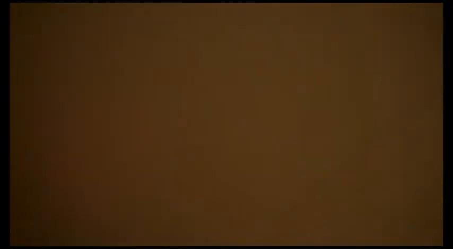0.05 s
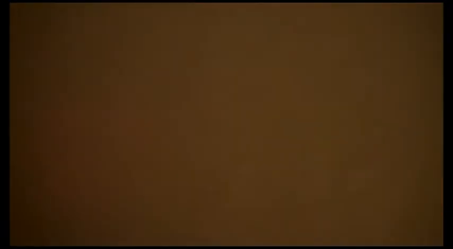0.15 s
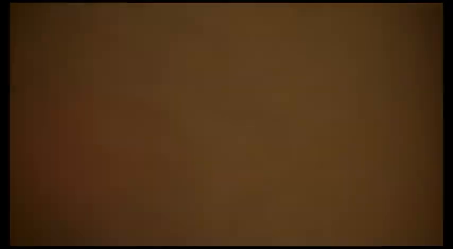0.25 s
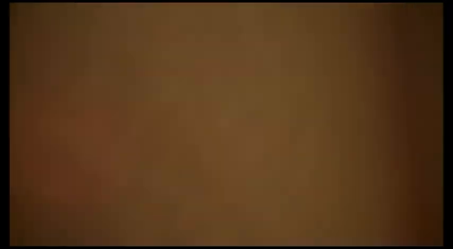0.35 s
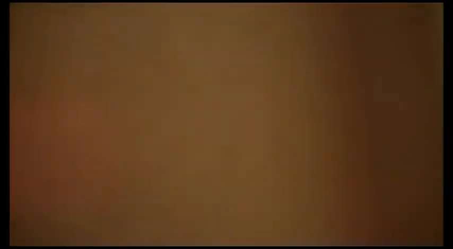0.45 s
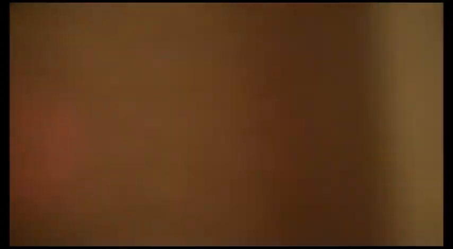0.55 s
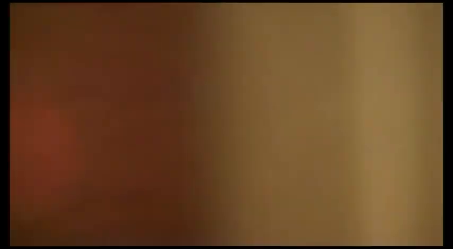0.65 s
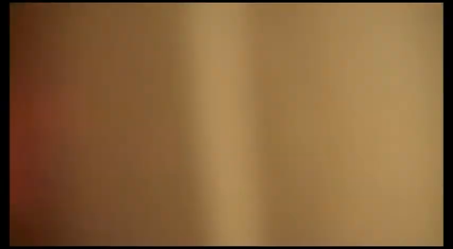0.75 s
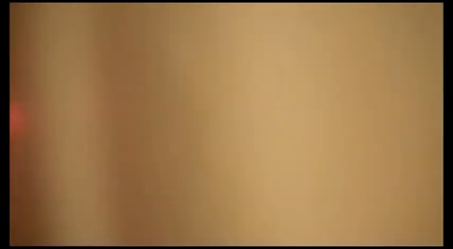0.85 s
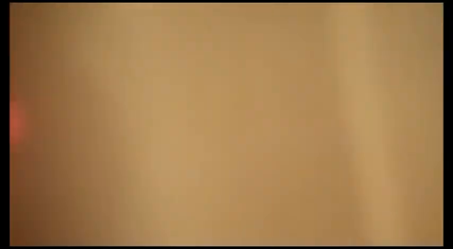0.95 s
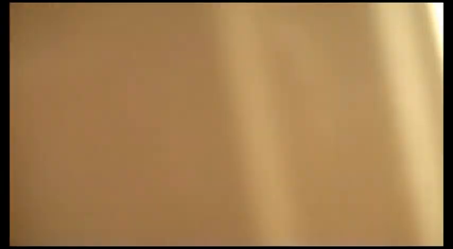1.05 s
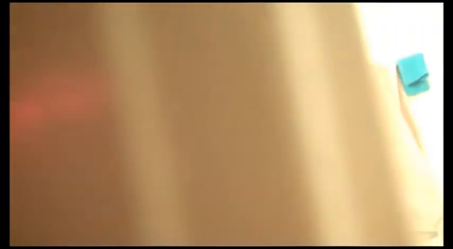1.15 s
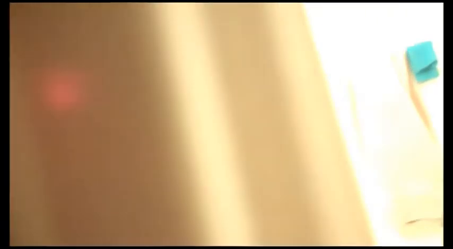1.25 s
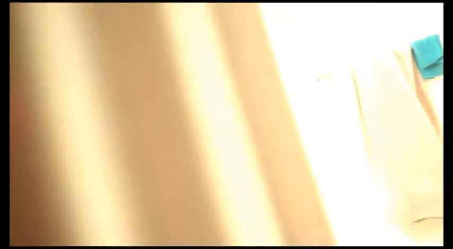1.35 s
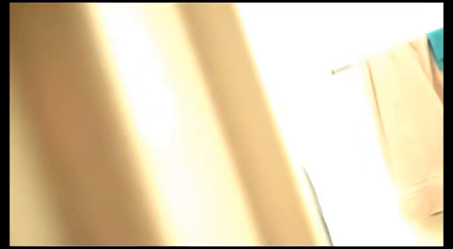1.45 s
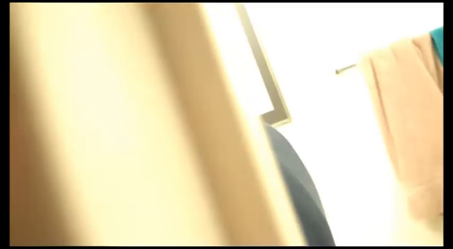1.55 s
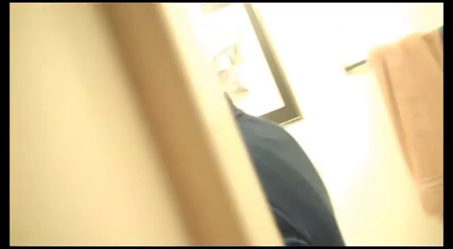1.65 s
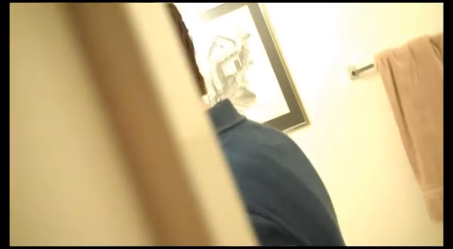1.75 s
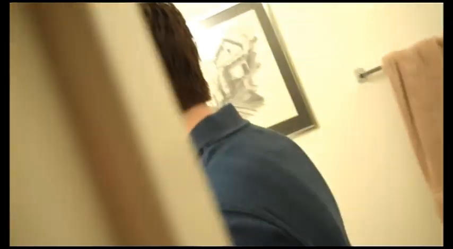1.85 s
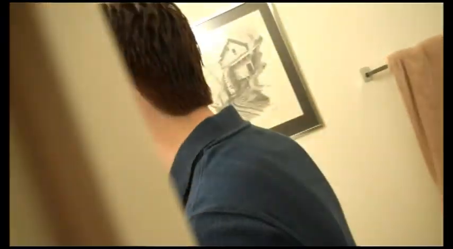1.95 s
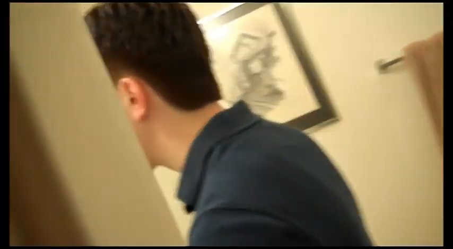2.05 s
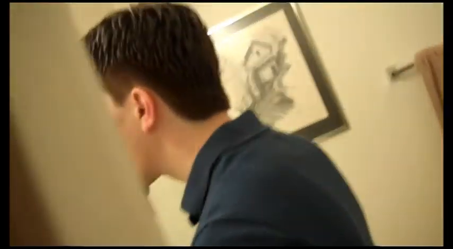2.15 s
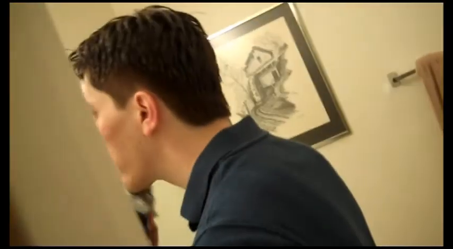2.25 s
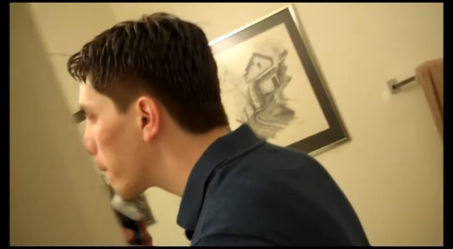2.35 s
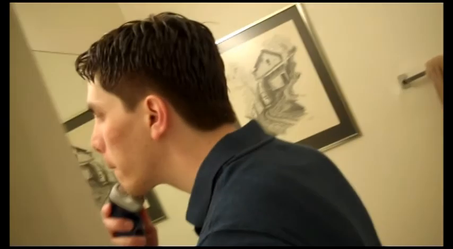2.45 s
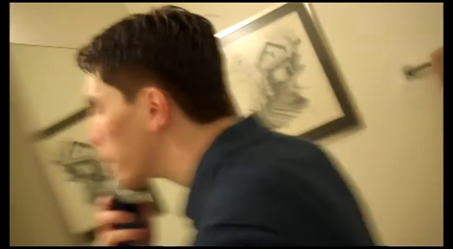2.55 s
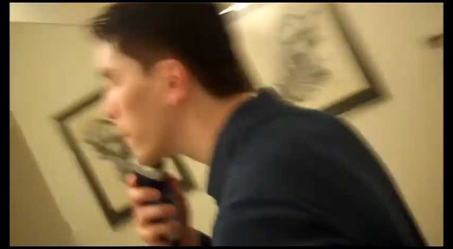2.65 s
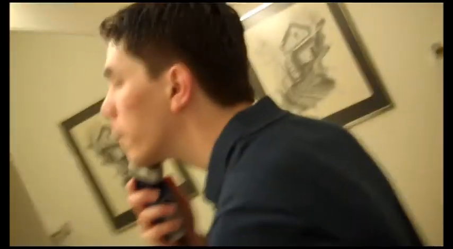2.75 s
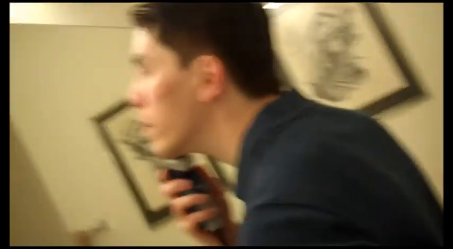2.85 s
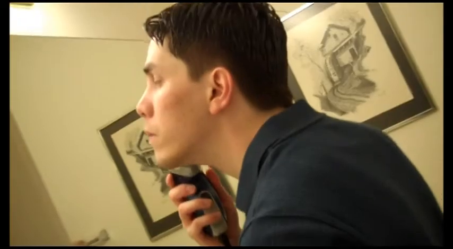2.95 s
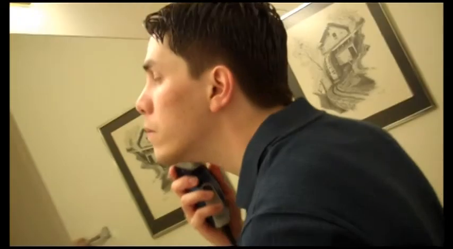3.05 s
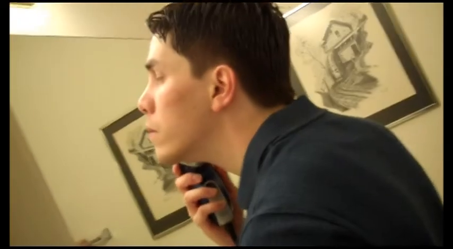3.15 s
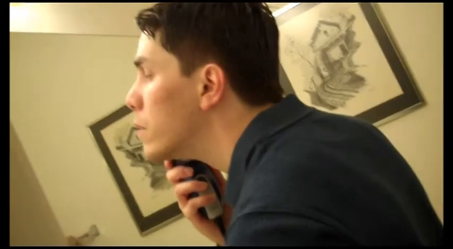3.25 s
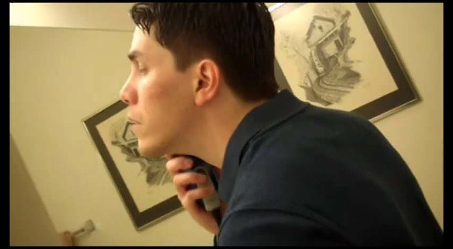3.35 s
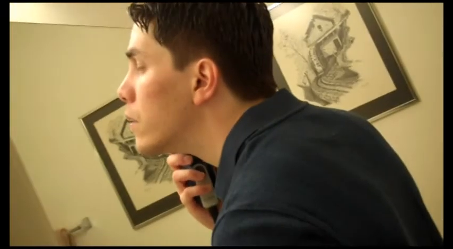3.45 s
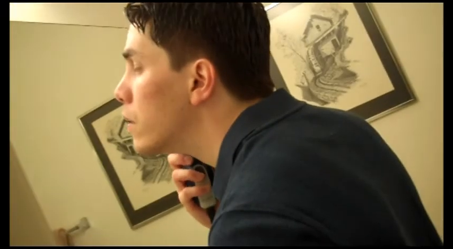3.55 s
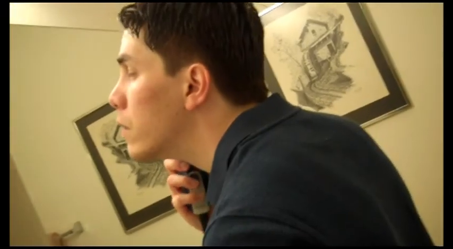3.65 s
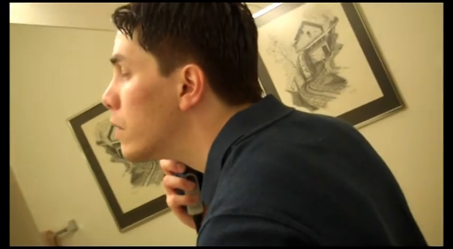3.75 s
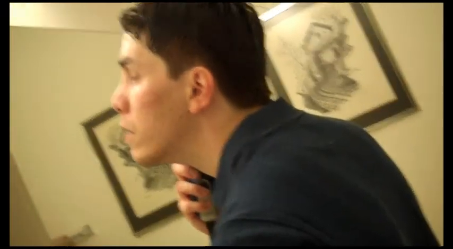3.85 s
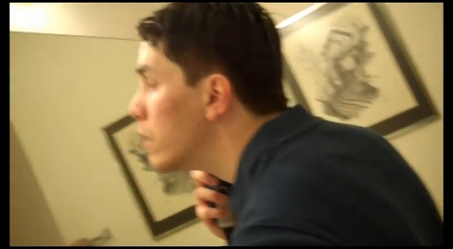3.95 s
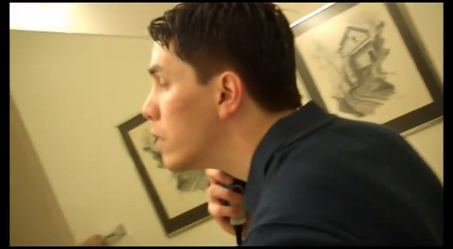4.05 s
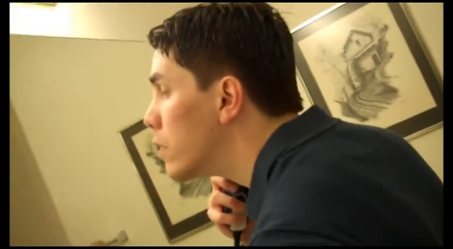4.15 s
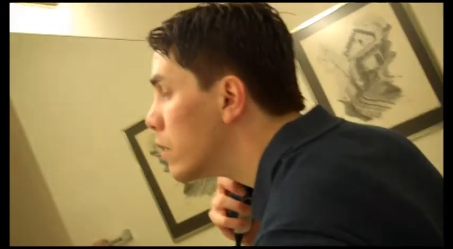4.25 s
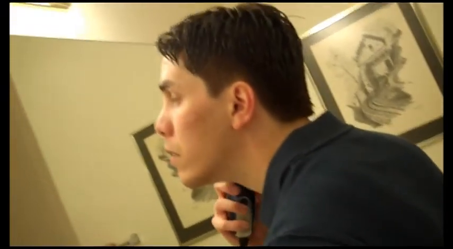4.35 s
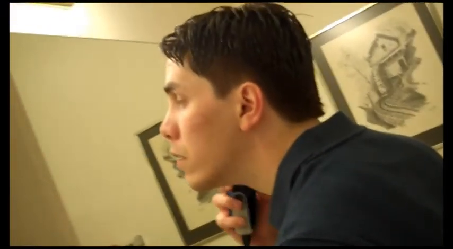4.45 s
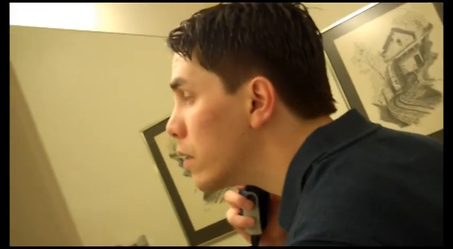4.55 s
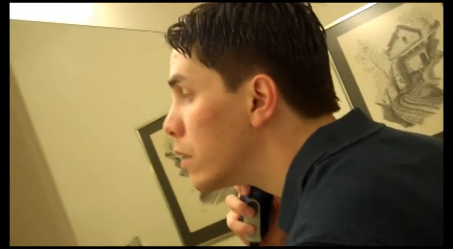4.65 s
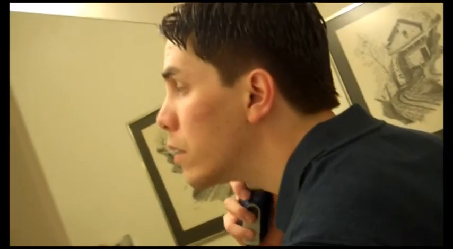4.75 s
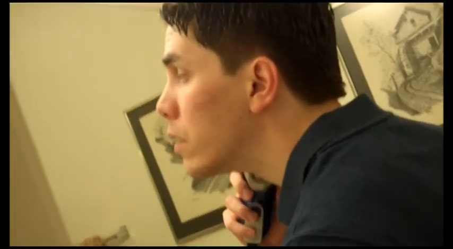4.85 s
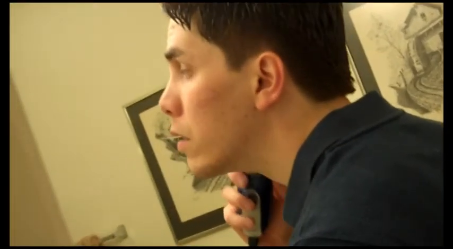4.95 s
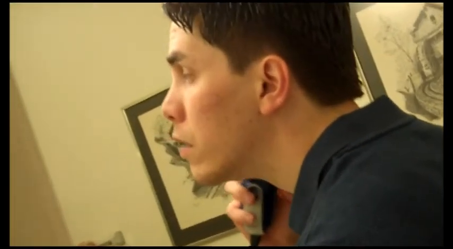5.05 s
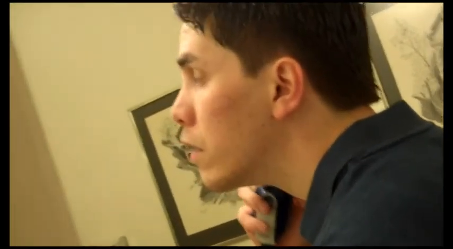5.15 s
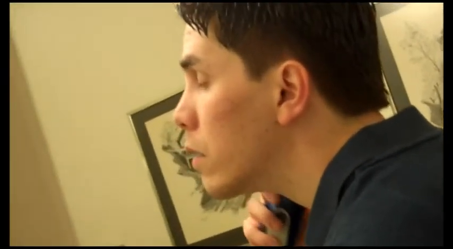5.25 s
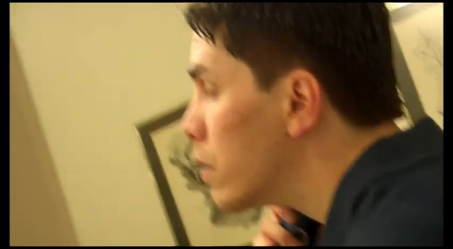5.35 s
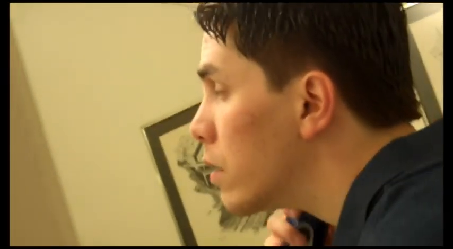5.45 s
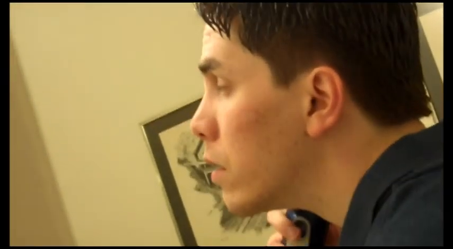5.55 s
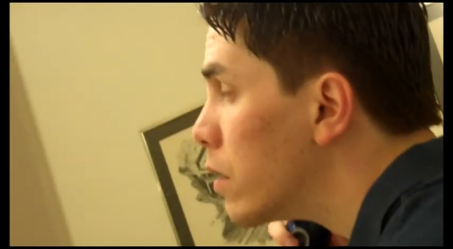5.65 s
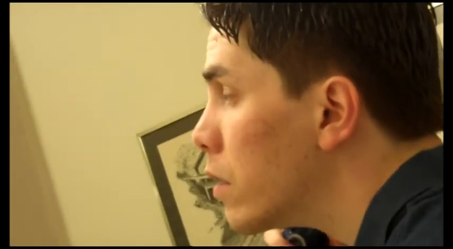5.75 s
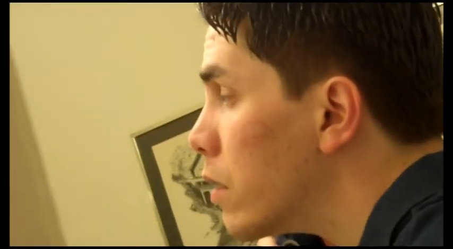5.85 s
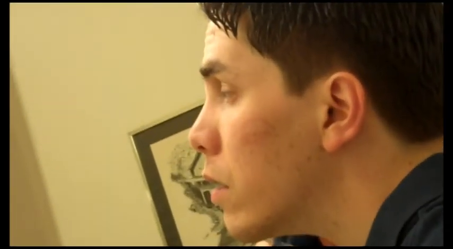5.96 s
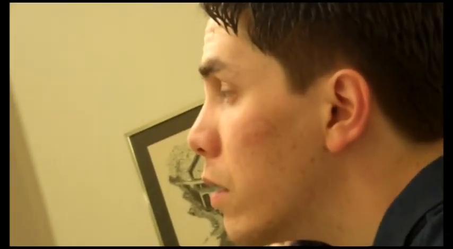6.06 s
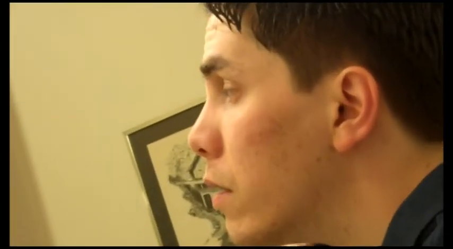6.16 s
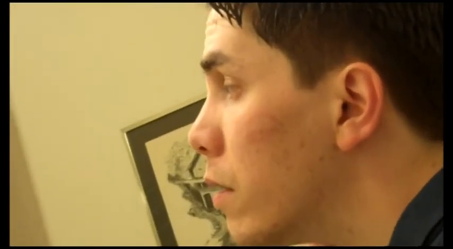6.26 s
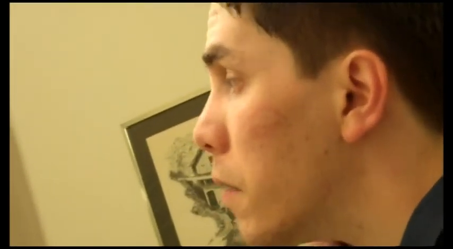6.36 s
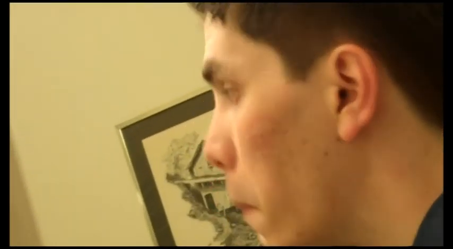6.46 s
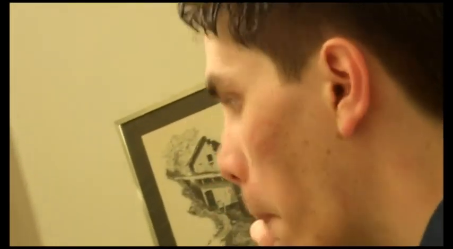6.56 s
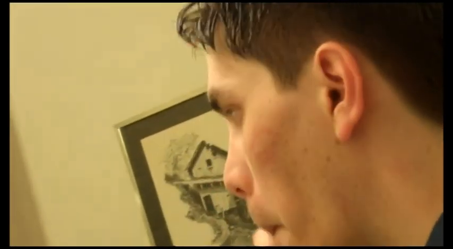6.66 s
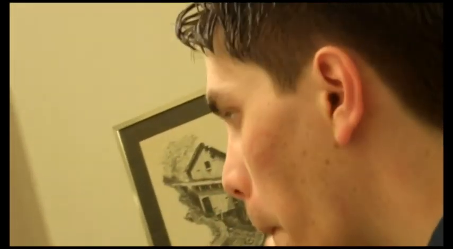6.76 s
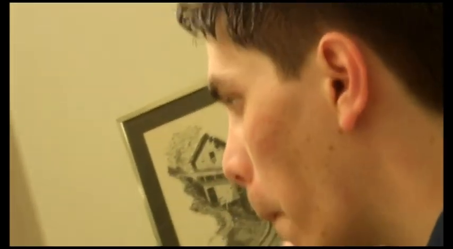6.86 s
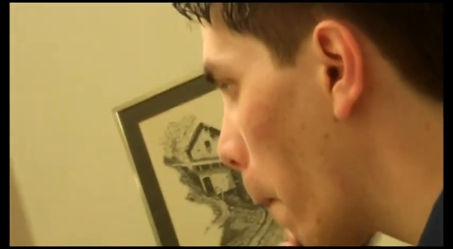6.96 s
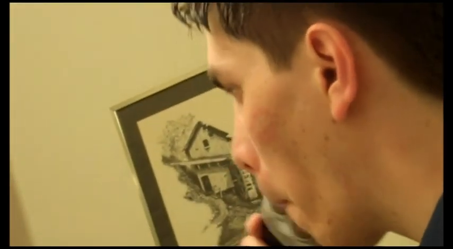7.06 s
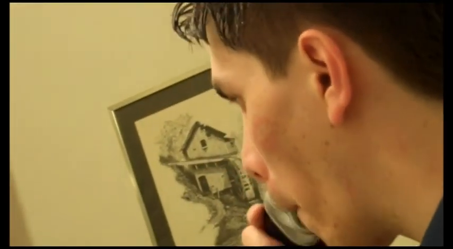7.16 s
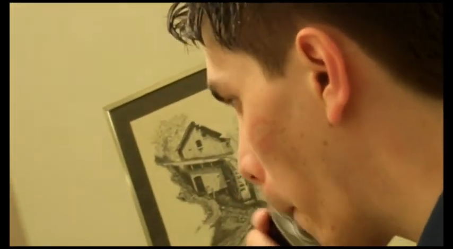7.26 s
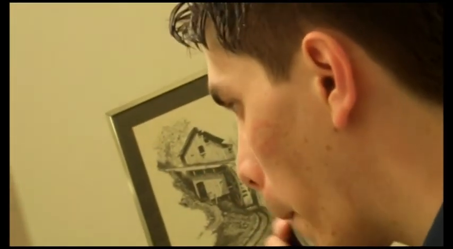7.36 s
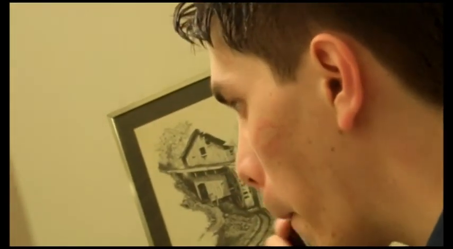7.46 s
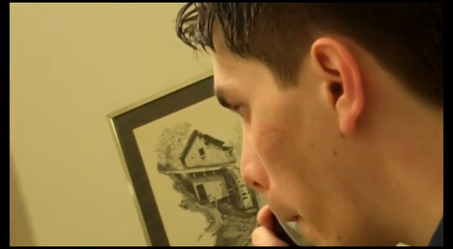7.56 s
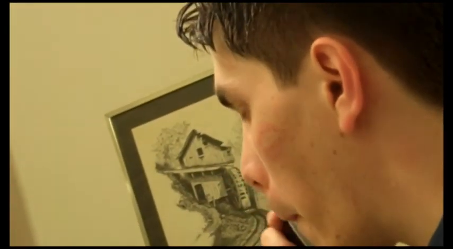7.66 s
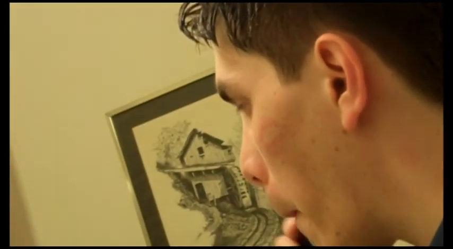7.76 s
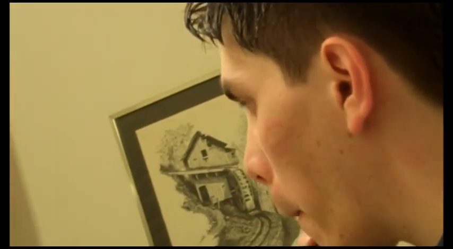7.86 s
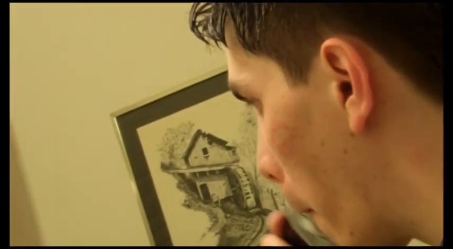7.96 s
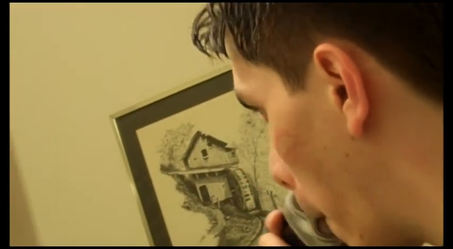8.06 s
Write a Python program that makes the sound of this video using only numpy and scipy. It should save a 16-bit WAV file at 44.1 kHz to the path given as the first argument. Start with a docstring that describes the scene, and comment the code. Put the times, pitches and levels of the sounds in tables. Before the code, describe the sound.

A brief soft low-end thump of the microphone settling opens the sound, with the electric shaver already running. From 0 to 1 s it is quieter and hollow, reflected off a door frame, with dull handling rustle around 0.3 and 0.9 s. Between 1 and 1.7 s it comes nearer and brighter, then stays close in the small tiled bathroom. Dry cutter hiss and grainy stubble rasp swell in irregular strokes, notably near 1.9, 2.3, 2.7, 4.8, 5.3 and 7.4 s. Beneath is a fairly steady motor hum, its tones gently swelling; above, a thin, rough whine near 3.3 kHz wavers, with sharper octave flares around 2.3, 4.3 and 7.3 s. A faint dull creak stutters at 3.35 to 3.5 s. The hiss is strongest around 7.3 s, and shaving continues unbroken to the end at about 8 s, over very faint mains hum and microphone hiss.

```python
"""Rotary shaver in a tiled bathroom

A rotary electric shaver runs over chin and neck in a small tiled bathroom; the listener steps in from the hall.
Cutters hiss against their combs and rasp on stubble: banded noise, lifted stroke by stroke.
The motor hums as sines on shaft orders; the gears whine as narrow bands near 3.3 kHz and an octave up.
Mains hum, rustle, a dull creak and faint hiss lie below; two microphone ports resonate at different pitches."""
import sys
import numpy as np
from scipy import signal
from scipy.fft import rfft, irfft, next_fast_len
from scipy.io import wavfile
from scipy.ndimage import uniform_filter1d, map_coordinates

SR = 44100
rng = np.random.default_rng(int(sys.argv[2]) if len(sys.argv) > 2 else 0)


def master_out(mix):
    """Clip the mix to full scale and print it as 16-bit PCM to the path in sys.argv[1]."""
    frames = np.transpose(np.atleast_2d(mix))
    ceiling = np.clip(frames, -1, 1)
    pcm = np.round(ceiling * 32767).astype(np.int16)
    wavfile.write(sys.argv[1], SR, pcm)


N = 356945

# "half-length" is the 1/e half-length of a bell, unless noted

# microphone floor, density: (frequency [Hz], relative level [dB per Hz])
FLOOR_SPECTRUM = [(20, -2), (60, -3), (200, -2), (500, 2), (1500, 0), (14500, -36)]
FLOOR_DB = -60.5
MAINS_HZ, MAINS_DB = 120.2, -69.5
# handling, dull: (middle [s], half-length [s], level [dB])
RUSTLE_MOVES = [(.3, 0.17, -56.5), (.85, 0.26, -57), (2.25, 0.39, -63.5), (5.05, 0.47, -64.5)]
RUSTLE_REST_DB = -70   # between moves
# slips of a dull creak: (time [s], click level [dB])
CREAK_SLIPS = [(3.345, -48), (3.356, -45), (3.367, -41), (3.402, -41), (3.413, -50), (3.428, -50),
               (3.451, -48), (3.484, -53)]
# creak resonances: (frequency [Hz], relative level [dB], 60 dB decay [s])
CREAK_MODES = [(392, -5.5, 0.072), (443, 3, 0.075), (495, -6, .06)]

# left-right likeness of noise and tones: (frequency [Hz], likeness [0..1])
LIKENESS = [(60, 0.01), (130, 0.84), (290, 0.92), (630, 1), (1390, 0.8), (3040, 0.46), (6660, 0.38),
            (14600, 0.14)]
# mirror, walls, basin: (delay [ms], level [dB])
WALL_ECHOES = [(1.3, -12), (2.9, -12), (4.7, -12), (7.3, -11), (11.1, -11), (16.3, -12)]
# inverted reflection off the door frame, shaver out of view: (time [s], delay [ms], level [dB])
DOOR_FRAME_ECHO = [(0, 0.54, -12), (.2, 0.52, -10), (.45, 0.41, -5.5), (.7, 0.38, -11.5), (.88, 0.39, -14),
                   (1.1, 0.34, -35), (8.09, 0.79, -37)]
FRAME_DULL_HZ = 5440   # the reflection loses its treble

# hiss bands that swell, perhaps as the head cups the skin:
# (middle [s], half-length [s], frequency [Hz], half-width [Hz], level [dB])
HOLLOWS = [(.28, 0.23, 3316, 330, -45.5), (.95, .1, 1680, 30, -50), (1.22, 0.12, 1640, 39, -46),
           (3.18, 0.097, 1736, 35, -47), (5.4, 3.2, 2188, 21, -61), (5.7, 0.76, 1920, 20, -58),
           (1.88, 0.07, 1680, 110, -40.5), (2.21, .04, 4240, 450, -37), (2.3, 0.06, 4580, 350, -37),
           (2.78, 0.24, 4650, 380, -37.5), (2.75, .2, 5170, 500, -45), (2.88, 0.12, 4150, 450, -40),
           (3.58, 0.065, 1743, 62, -44), (3.6, 0.24, 3740, 53, -48), (7.41, 0.035, 1666, 180, -39.5),
           (7.8, .15, 5220, 200, -38.5), (1.5, 0.24, 5100, 420, -39.5), (6.95, 0.19, 5320, 870, -37.5)]
# steady narrow ring of the head, faded in from 1.9 s and out by 4.3 s
RING_HZ, RING_HALF_WIDTH_HZ, RING_UNDER_HISS_DB = 3350, 74, -15
RING_FROM_S, RING_TO_S = 1.9, 4.3

# gear whine: (time [s], frequency [Hz], level [dB])
WHINE = [(.7, 3210, -64), (1.3, 3140, -47), (1.4, 3150, -42.5), (1.68, 3160, -45), (1.74, 3164, -47),
         (1.95, 3104, -40.5), (2.06, 3230, -47), (2.25, 3210, -43), (2.5, 3200, -52), (2.56, 3196, -40.5),
         (2.75, 3240, -43), (2.92, 3240, -45), (3.0, 3260, -39.5), (3.25, 3330, -38.5), (3.36, 3310, -38),
         (3.42, 3270, -40), (3.73, 3265, -41), (3.8, 3210, -47), (4.31, 3214, -52), (4.35, 3235, -41),
         (4.42, 3290, -40), (4.58, 3340, -43), (4.64, 3310, -49), (4.83, 3210, -50), (4.88, 3250, -44),
         (4.93, 3330, -43), (5.05, 3385, -41.5), (5.2, 3350, -41.5), (5.4, 3330, -45), (5.8, 3337, -42),
         (6.2, 3326, -43.5), (6.55, 3370, -43.5), (6.9, 3360, -47.5), (7.0, 3360, -37), (7.08, 3365, -41),
         (7.45, 3300, -47), (7.6, 3350, -47), (7.88, 3330, -54), (7.91, 3320, -38), (8.03, 3345, -38.5),
         (8.09, 3390, -42)]
# flares of the whine's octave: (middle [s], half-length [s], level [dB])
OCTAVE_FLARES = [(1.88, 0.2, -41.5), (2.18, 0.064, -42), (2.31, 0.016, -30), (3.82, 0.15, -38),
                 (4.27, .02, -37), (4.4, 0.086, -39), (5.65, 0.26, -42), (6.55, 0.092, -37.5),
                 (7.27, 0.095, -33)]
OCTAVE_DB = -48.5   # between flares

# motor shaft, mean course: (time [s], speed [turns/s])
SHAFT_SPEED = [(0.14, 101.7), (0.64, 102.6), (1.0, 104.7), (1.7, 104.7), (2.39, 102.7), (2.89, 103.3),
               (3.14, 105.4), (3.89, 102.2), (4.14, 102.7), (4.39, 104.7), (5.39, 104.8), (5.7, 106.7),
               (6.14, 105.7), (6.64, 106.8), (7.14, 105.2), (7.89, 102.1)]
# motor hum: (shaft order [multiple], relative level [dB])
HUM_ORDERS = [(4, -28), (5, -26), (6, -20), (7, -20), (8, -30), (10, -19), (11, -21), (13, -20), (15, -19),
              (18, -16), (21, -14)]
# an order swells where the room carries it well, flat-topped:
# (middle [s], half-length [s], shaft order [multiple], rise [dB])
ORDER_SWELLS = [(1.29, 0.33, 11, 18.5), (2.93, .15, 11, 8), (1.8, 0.12, 6, 9), (3.3, .65, 6, 4.5),
                (4.5, 0.4, 6, 4), (6.02, 0.26, 6, 5.5), (2.8, 0.2, 7, 3), (3.505, 0.4, 7, 7),
                (4.4, 0.15, 7, 9), (6.1, 0.84, 7, 8), (1.75, .25, 10, 7), (5.45, 0.27, 10, 10.5),
                (6, 0.34, 10, 8), (6.7, 0.48, 10, 9.5), (1.6, 0.36, 5, 2), (3, 0.55, 18, 6)]
# lowest motor tone, order 3: (time [s], peak level [dB])
THIRD_ORDER = [(0.0, -64.5), (1.24, -68), (3.2, -60), (3.42, -69), (3.72, -61), (4.05, -63), (4.19, -78),
               (4.35, -60.5), (4.6, -79), (5.3, -65.5), (5.41, -65.5), (6.5, -68), (6.85, -62), (7.19, -68),
               (7.3, -63.5), (8.09, -65.5)]
MOTOR_UNDER_RASP_DB = -4.5

# cutter hiss, density: (frequency [Hz], relative level [dB per Hz])
CUTTER_SPECTRUM = [(1500, -7.5), (2500, -19.5), (3300, -7), (4300, -9), (5500, 3), (7000, 0), (9000, -5.5),
                   (12000, -17.5), (14500, -18)]
# stubble rasp, density: (frequency [Hz], relative level [dB per Hz])
RASP_SPECTRUM = [(150, -31), (300, -26), (600, -12.5), (1100, -2), (1900, -5.5), (2800, -4), (4000, -3),
                 (6000, -1)]
# strokes into stubble: (middle [s], half-length [s], rasp rise [dB])
STROKES = [(.3, 0.075, 3.5), (0.751, 0.39, 4), (1.2, 0.17, 1.5), (1.88, 0.066, 6.5), (2.3, 0.1, 4.5),
           (2.65, 0.13, 4.5), (2.95, 0.22, 4), (3.56, 0.1, 1.5), (3.83, 0.11, 3.5), (4.12, 0.35, 4),
           (4.75, 0.17, 5), (5.3, 0.14, 5.5), (5.95, 0.078, 3), (6.15, 0.29, 3), (6.62, 0.038, 3.5),
           (6.92, 0.091, 2.5), (7.38, 0.057, 5), (7.62, 0.078, 1), (7.83, 0.26, 4)]
RASP_UNDER_HISS_DB, HISS_FOLLOWS = -8.5, 0.2   # between strokes; share of the rise the hiss takes
# listener comes round the door frame and closer: (time [s], base cutter hiss [dB], left minus right [dB])
APPROACH = [(0.0, -37.5, -2), (0.5, -40, -1.5), (1.0, -37, -2), (1.35, -33.5, -3), (1.62, -32, -1),
            (2.1, -33.5, -0.5), (2.48, -34, 0), (2.8, -32.5, -.5), (3.4, -32, -1), (3.9, -34.5, -1),
            (4.9, -32.5, 0), (5.6, -34, -0.5), (6.5, -33.5, 0), (6.72, -34, -1), (6.92, -33, -1),
            (7.1, -32, -0.5), (7.3, -30, -1.5), (7.55, -32, 0), (7.85, -32.5, 0), (8.09, -33, -0.5)]
# extra path to the left port: (time [s], lag [ms])
LEFT_LAG = [(0, 0.087), (1.4, 0.078), (1.7, 0.029), (8.09, 0.016)]

# microphone ports: (frequency [Hz], left gain [dB], right gain [dB])
PORTS = [(60, 2.5, 2), (705, -0.5, -2), (2270, 3, 4.5), (4440, 0, 2.5), (5950, 1, 7.5), (7260, 6, -6.5),
         (7920, 3.5, -7), (10210, -11, -21.5), (12000, -8, -18.5), (13150, 0.5, -15), (14700, -5, -21)]
PREAMP_DB = -71   # input hiss, before the offset of each side
SETTLE_S, SETTLE_DB = 0.085, -18.5   # inputs settle from opposite offsets after switch-on
# brief wavering offset, same in both channels, until 0.18 s
START_OFFSET_DB, START_OFFSET_HZ, START_OFFSET_TO_S = -50, 22, .18
# sound below about 176 Hz is absent at first and fades in from 0.45 s
LOWS_FROM_S, LOWS_BELOW_HZ = .45, 176
CUTOFF_HZ = 14200


def from_db(db):
    """Decibels to gain."""
    return 10 ** (np.asarray(db) / 20)


def rms_one(x):
    """Scale to rms 1."""
    return x / np.sqrt(np.mean(np.abs(x) ** 2) + 1e-20)


def in_time(rows):
    """Columns of a curve at every sample."""
    s, *columns = np.transpose(rows)
    return [np.interp(np.arange(N) / SR, s, column) for column in columns]


def at_hz(points, hz, axis=1):
    """Spectrum column read on a log-frequency axis."""
    points = np.array(points)
    return np.interp(np.log(hz), np.log(points[:, 0]), points[:, axis])


def bump(middle_s, half_s):
    """Smooth swell of height 1."""
    return np.exp(-((np.arange(N) / SR - middle_s) / half_s) ** 2)


def drift(pole_hz):
    """Random wander of rms 1: noise at SR / 40 through two equal one-pole low-passes."""
    r = np.exp(-2 * np.pi * pole_hz * 40 / SR)
    noise = rng.standard_normal(N // 40 + 2002)
    slow = signal.lfilter([1], [1, -2 * r, r * r], noise)[2000:]   # drop the run-in
    return np.interp(np.arange(N) / 40, np.arange(len(slow)), rms_one(slow))


def pair(mid, side, alike):
    """Left and right as sum and difference; alike sets the shared part."""
    alike = np.clip(alike, 0, 1)
    shared = np.sqrt(1 + alike) * mid
    opposed = np.sqrt(1 - alike) * side * [[1], [-1]]
    return (shared + opposed) / np.sqrt(2)


def hiss(spectrum, patchy_db, flicker_db, apart=False):
    """About half-octave bands of stereo noise, own slow patches, shared fast flicker; rms 1."""
    low_hz, high_hz = spectrum[0][0], spectrum[-1][0]
    edges = np.geomspace(low_hz, high_hz, int(2 * np.log2(high_hz / low_hz)) + 2)
    white = rng.standard_normal((2, 2, N))   # neighbouring bands alternate sources
    flicker = drift(13.0)
    out = 0
    for k, (low, high) in enumerate(zip(edges, edges[1:])):
        band = signal.butter(2, [low, high], "band", fs=SR, output="sos")
        mid, side = signal.sosfilt(band, white[k % 2])
        hz = np.sqrt(low * high)
        gain = from_db(at_hz(spectrum, hz) + patchy_db * drift(3.1) + flicker_db * flicker)
        out = out + gain * pair(mid, side, 0 if apart else at_hz(LIKENESS, hz))
    return rms_one(out)


def whistle(hz, half_width_hz, alike, steady=0):
    """Random modulation smears a tone into a band following hz, around a steady core; rms 1."""
    carrier = np.exp(2j * np.pi * np.cumsum(hz) / SR)

    def smeared():
        return np.real((steady + drift(half_width_hz) + 1j * drift(half_width_hz)) * carrier)
    return rms_one(pair(smeared(), smeared(), alike))


def mains_hum():
    """Sine of wavering level."""
    level = from_db(MAINS_DB + 0.74 * drift(6.8))
    return np.sqrt(2) * level * np.sin(2 * np.pi * MAINS_HZ * np.arange(N) / SR)


def rustle():
    """Handling: dull patchy noise that swells with each move."""
    moves = from_db(RUSTLE_REST_DB)
    moves = moves + sum(from_db(db) * bump(s, half_s) for s, half_s, db in RUSTLE_MOVES)
    return moves * hiss([(200, -9.5), (400, 1.5), (800, -6)], patchy_db=2.5, flicker_db=1.5)


def surroundings():
    """Mains hum, handling rustle and the microphones' own unrelated hiss."""
    floor = from_db(FLOOR_DB) * hiss(FLOOR_SPECTRUM, patchy_db=2.0, flicker_db=-1.0, apart=True)
    return mains_hum() + rustle() + floor


def creak():
    """Slips ring three decaying modes, softened by a band-pass."""
    clicks, out = np.full(N, 1e-18), 0
    for s, db in CREAK_SLIPS:
        clicks[round(s * SR)] = from_db(db)
    for hz, level_db, t60_s in CREAK_MODES:
        r, w = from_db(-60 / (t60_s * SR)), 2 * np.pi * hz / SR
        ring = signal.lfilter([0, np.sin(w)], [1, -2 * r * np.cos(w), r * r], clicks)
        out = out + from_db(level_db) * ring
    soft = signal.butter(4, [340, 520], "band", fs=SR, output="sos")
    return signal.sosfilt(soft, out)


def walls(x):
    """Near reflections whose paths shift as heads and hands move: a sliding comb; rms 1."""
    out, at = x, np.arange(N)
    for delay_ms, echo_db in WALL_ECHOES:
        late = at - SR * (delay_ms + 0.1324 * drift(0.45)) / 1000
        echo = np.array([np.interp(late % N, at, side) for side in x])
        out = out + from_db(echo_db) * echo
    return rms_one(out)


def late_by(x, delay_ms):
    """One channel through a varying delay, cubic interpolation."""
    return map_coordinates(x, [np.arange(N) - delay_ms * SR / 1000], order=3, mode="nearest")


def door_frame(x):
    """Short inverted reflection: notches slide up as the path shortens and the echo fades."""
    delay_ms, echo_db = in_time(DOOR_FRAME_ECHO)
    echo = np.array([late_by(side, delay_ms) for side in x])
    echo = signal.sosfiltfilt(signal.butter(2, FRAME_DULL_HZ, fs=SR, output="sos"), echo)
    return x - from_db(echo_db) * echo


def hollows():
    """Narrow noise bands that swell and fade."""
    out = 0
    for s, half_s, hz, half_width_hz, level_db in HOLLOWS:
        band = whistle(np.full(N, hz), half_width_hz, at_hz(LIKENESS, hz))
        out = out + from_db(level_db) * bump(s, half_s) * band
    return out


def head_ring(near_db):
    """Narrow band of fixed pitch that comes and goes a little."""
    t = np.arange(N) / SR
    fade_in = np.clip((t - RING_FROM_S) / 0.23, 0, 1)
    fade_out = np.clip((RING_TO_S - t) / 0.19, 0, 1)
    band = whistle(np.full(N, RING_HZ), RING_HALF_WIDTH_HZ, alike=.3, steady=0.27)
    return fade_in * fade_out * from_db(near_db + RING_UNDER_HISS_DB + 2.0 * drift(0.85)) * band


def gears():
    """Mesh whine smeared by uneven contacts, with a thinner one an octave up."""
    hz, low_db = in_time(WHINE)
    octave = whistle(2 * hz + 40 * drift(12), half_width_hz=100, alike=0.17, steady=0.5)
    low = whistle(hz + 34 * drift(40), half_width_hz=95, alike=0.3, steady=1.8)
    octave_gain = from_db(OCTAVE_DB) * np.clip(np.arange(N) / SR - 1, 0, 1)   # fades in from 1 to 2 s
    octave_gain = octave_gain + sum(from_db(db) * bump(s, half_s) for s, half_s, db in OCTAVE_FLARES)
    return from_db(low_db) * low + octave_gain * octave


def motor(level_db, third_db):
    """Sines on shaft orders, swelling as shaver and listener move through standing waves."""
    t = np.arange(N) / SR
    turns = np.cumsum(in_time(SHAFT_SPEED)[0] + .5 * drift(5.07)) / SR
    out = 0
    for order, order_db in HUM_ORDERS:
        swell_db = sum(db * np.exp(-((t - s) / half_s) ** 8)
                       for s, half_s, k, db in ORDER_SWELLS if k == order)
        angle = 2 * np.pi * (order * turns + rng.random())
        mid = from_db(3.5 * drift(3.0)) * np.sin(angle)
        side = from_db(1.7 * drift(2.4)) * np.sin(angle + 2.3 * drift(0.36))
        alike = at_hz(LIKENESS, order * SHAFT_SPEED[0][1])
        out = out + from_db(order_db + swell_db) * pair(mid, side, alike)
    third = from_db(third_db) * np.sin(2 * np.pi * 3 * turns)
    return from_db(level_db) * out + third


def cutters(level_db):
    """Blades on their combs: bright, nearly even hiss off the walls."""
    return from_db(level_db) * walls(hiss(CUTTER_SPECTRUM, patchy_db=0.78, flicker_db=0.44))


def stubble_rasp(level_db):
    """Hairs being cut: broad, patchier noise off the walls."""
    return from_db(level_db) * walls(hiss(RASP_SPECTRUM, patchy_db=1.5, flicker_db=.5))


def scene():
    """Shaver layers share one direction; each stroke lifts the rasp and, less, the hiss."""
    near_db, pan_db = in_time(APPROACH)
    press_db = sum(db * bump(s, half_s) for s, half_s, db in STROKES)
    rasp_db = near_db + RASP_UNDER_HISS_DB + press_db
    motor_db = uniform_filter1d(rasp_db, size=SR // 2) + MOTOR_UNDER_RASP_DB   # half-second mean
    shaver = door_frame(cutters(near_db + HISS_FOLLOWS * press_db) + stubble_rasp(rasp_db))
    shaver = shaver + motor(motor_db, in_time(THIRD_ORDER)[0])
    left, right = shaver + gears() + hollows() + head_ring(near_db)
    left = late_by(left, in_time(LEFT_LAG)[0])
    panned = np.array([left, right]) * from_db(pan_db / 2 * [[1], [-1]])
    return panned + creak() + surroundings()


def start_offsets():
    """Opposite offsets die away; a brief wavering offset is the same in both channels."""
    t = np.arange(N) / SR
    decay = (1 + t / SETTLE_S) * np.exp(-t / SETTLE_S)
    settling = decay * from_db(SETTLE_DB) * [[-1], [1]]
    gate = np.clip((START_OFFSET_TO_S - t) / .015, 0, 1)
    wavering = from_db(START_OFFSET_DB) * (1 + 0.57 * drift(START_OFFSET_HZ))
    return settling + wavering * gate


def record(dry):
    """Port colour for each side, input hiss, lows faded in, start offsets, top cut."""
    size = next_fast_len(N)
    hz = np.maximum(np.arange(size // 2 + 1) * SR / size, 1)
    colour = from_db([at_hz(PORTS, hz, axis=1), at_hz(PORTS, hz, axis=2)])
    wet = irfft(rfft(dry, size) * colour, size)[:, :N]
    preamp_db = PREAMP_DB + np.array([[2.0], [-6.0]])   # left, right
    wet = wet + from_db(preamp_db) * rng.standard_normal((2, N))
    lows = signal.sosfiltfilt(signal.butter(4, LOWS_BELOW_HZ, fs=SR, output="sos"), wet)
    wet = wet - lows * np.clip((LOWS_FROM_S - np.arange(N) / SR) / .03 + 1, 0, 1)   # 30 ms fade-in
    steep = signal.ellip(12, .5, 70, CUTOFF_HZ, fs=SR, output="sos")
    return signal.sosfilt(steep, wet + start_offsets())


dry = scene()
out = record(dry)
master_out(out)
```